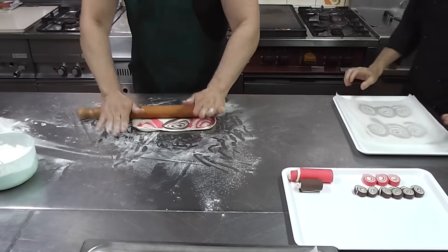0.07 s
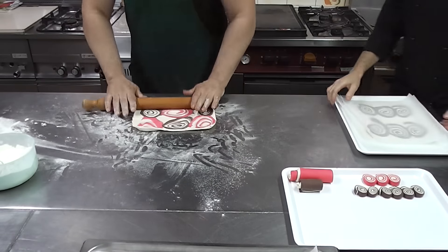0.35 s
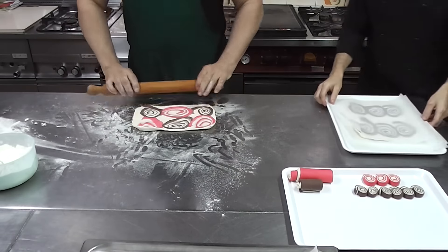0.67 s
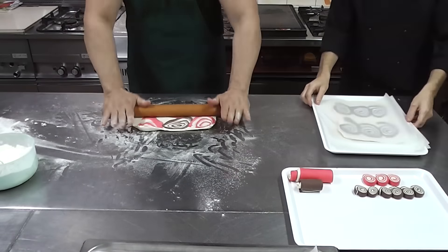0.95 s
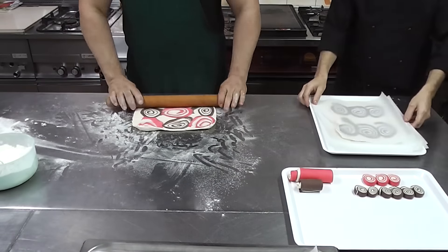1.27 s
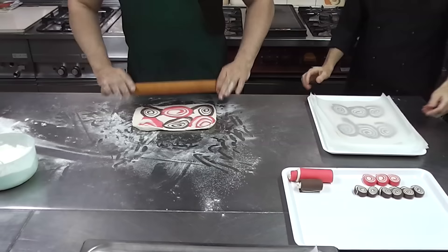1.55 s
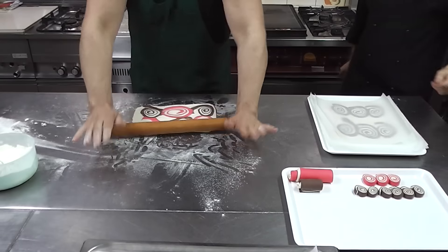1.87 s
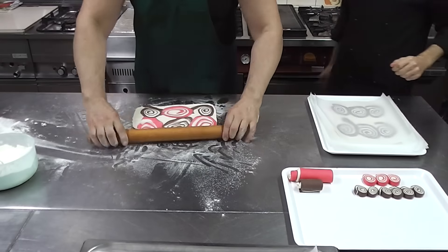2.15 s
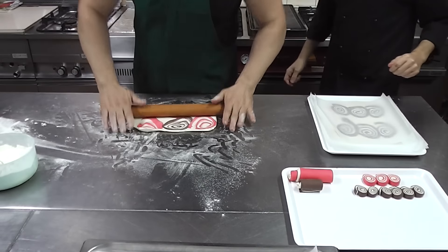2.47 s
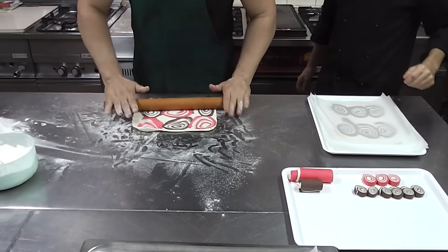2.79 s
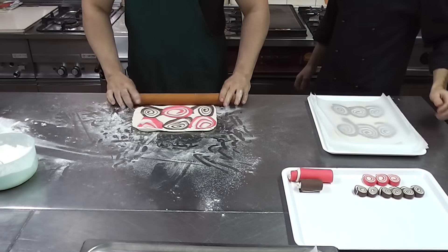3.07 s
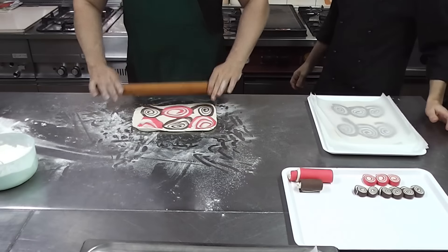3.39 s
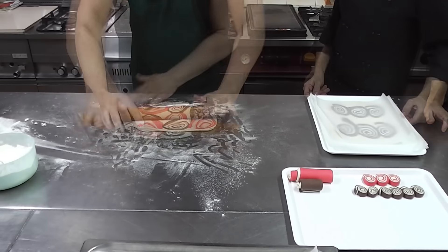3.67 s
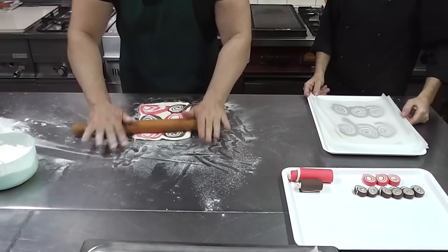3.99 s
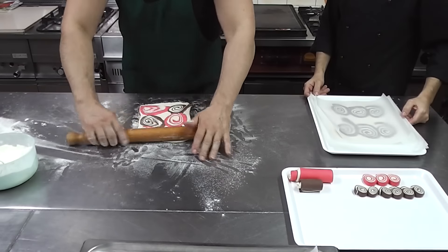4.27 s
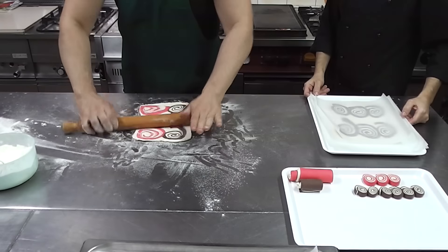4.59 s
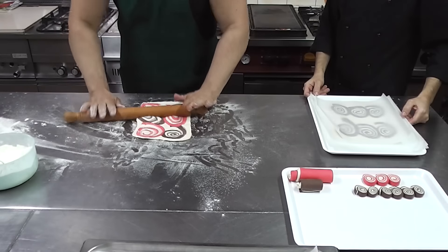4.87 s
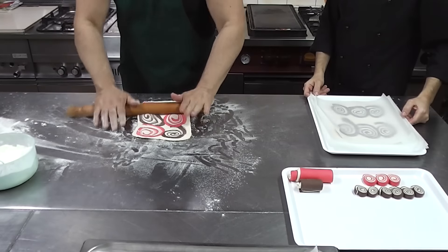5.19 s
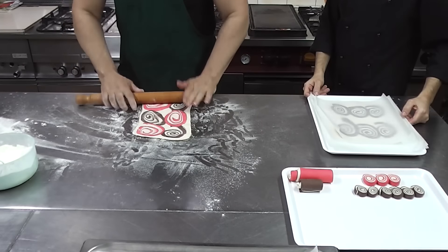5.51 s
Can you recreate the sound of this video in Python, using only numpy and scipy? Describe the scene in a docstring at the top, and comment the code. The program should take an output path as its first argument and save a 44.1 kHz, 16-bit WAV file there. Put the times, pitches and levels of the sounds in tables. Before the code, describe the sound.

A wooden rolling pin thuds, knocks and rumbles over dough on a booming steel worktop, with palms swishing and ventilation humming.

```python
"""A hard-walled kitchen: a wooden rolling pin flattens dough on a stainless-steel worktop.
The pin thuds onto the dough and knocks on the steel, which booms and rings into the room.
Between blows it rumbles over lumps, floury palms swish on the wood, and hands and tray bump lightly.
Ventilation rushes and hums underneath. Brief bright clicks imitate recorder overload on loud blows."""
import sys
import numpy as np
from scipy import signal
from scipy.fft import rfft, irfft
from scipy.io import wavfile
from scipy.ndimage import uniform_filter1d

SR = 44100
rng = np.random.default_rng(int(sys.argv[2]) if len(sys.argv) > 2 else 0)


def dump(signal):
    """Clip the signal to [-1, 1] and save it as 16-bit WAV at the path in sys.argv[1]."""
    limited = np.clip(np.atleast_2d(signal).T, -1, 1)
    pcm = np.round(limited * 32767).astype(np.int16)
    wavfile.write(sys.argv[1], SR, pcm)


N = 253134
TAIL_SAMPLES = 32768


def amp(db):
    """Decibels to gain."""
    return 10 ** (np.asarray(db) / 20)


def unit_rms(x):
    """Scales to an rms of one."""
    return x / np.sqrt(np.mean(x ** 2) + 1e-20)


def lookup(table, hz):
    """Interpolates a table over log frequency."""
    table_hz, value = np.transpose(table)
    return np.interp(np.log(hz + 1), np.log(table_hz + 1), value)


def colour(x, spectrum):
    """Filters by a spectrum table."""
    size = x.shape[-1]
    return irfft(rfft(x) * amp(lookup(spectrum, np.fft.rfftfreq(size, 1 / SR))), size)


def bell(hz, centre_hz, half_width_oct):
    """Spectral peak of unit height."""
    return 1 / (1 + (np.log2((hz + 1) / centre_hz) / half_width_oct) ** 2)


def pulse(gain):
    """Minimum-phase pulse with this magnitude spectrum."""
    log_gain = np.log(np.maximum(np.r_[gain, gain[-2:0:-1]], 1e-5))
    spectrum = np.exp(np.conj(signal.hilbert(log_gain)))
    return np.fft.ifft(spectrum).real[None, :len(gain)]


def convolve(response, force):
    """Drives a response with a force."""
    return signal.fftconvolve(response, force, axes=1)


def ring(modes):
    """One damped sine per mode: unit energy times its level."""
    t = np.arange(TAIL_SAMPLES) / SR
    hz, db, t60_s = np.transpose(modes)[:, :, None]
    waves = np.sin(2 * np.pi * hz * t) * np.exp(-np.log(1000) * t / t60_s)
    return waves / np.linalg.norm(waves, axis=1, keepdims=True) * amp(db)


def wander(depth_db, window_s):
    """Randomly wandering gain."""
    drift = uniform_filter1d(rng.standard_normal(N), max(int(window_s * SR), 1))
    return amp(depth_db * unit_rms(drift))


def add(mix, time_s, sound):
    """Mixes in a stereo sound."""
    start = round(time_s * SR)
    sound = sound[:, max(-start, 0):]
    part = mix[:, max(start, 0):][:, :sound.shape[1]]
    part += sound[:, :part.shape[1]]


# Left-right coherence of the room (frequency [Hz], coherence [0-1])
COHERENCE = [(100, .997), (300, .985), (600, .92), (1000, .76), (2000, .58), (4000, .5), (8000, .48),
             (14000, .55)]
def diffuse(size):
    """Stereo white noise: alike in the bass, less so in the treble."""
    a, b = rfft(rng.standard_normal((2, size)))
    coherence = lookup(COHERENCE, np.fft.rfftfreq(size, 1 / SR))
    mid, side = a * np.sqrt((1 + coherence) / 2), b * np.sqrt((1 - coherence) / 2)
    return irfft(np.array([mid + side, mid - side]), size)


# Air rush spectrum (frequency [Hz], relative level [dB])
AIR_SPECTRUM = [(20, -24), (40, -9), (72, 0), (130, -3), (220, -3), (350, -9.5), (800, -11.5), (1300, -16),
                (1900, -16), (2600, -25.5), (4300, -25), (9500, -28), (12500, -34), (16000, -40)]
# Hum tones (frequency [Hz], level [dB])
HUM_TONES = [(62, -52), (100, -54)]
def ventilation(air_db=-48):
    """Steady rush of air with a wavering hum."""
    t = np.arange(N) / SR
    hum = np.zeros(N)
    for hz, db in HUM_TONES:
        tone = np.sin(2 * np.pi * (hz * t + rng.random()))
        hum += amp(db) * unit_rms(tone * wander(depth_db=3, window_s=.2))
    return amp(air_db) * unit_rms(colour(diffuse(N), AIR_SPECTRUM)) + hum


def hand_speed(start_s, length_s, attack_s=.022, swell_db=4.5, release_s=.055):
    """One stroke, 0-1: the hand takes hold, gathers speed, then slows."""
    t = np.maximum(np.arange(N) / SR - start_s, 0)
    attack = 1 - np.exp(-t / attack_s)
    swell = amp(swell_db * (np.minimum(t / length_s, 1) - 1))
    release = np.exp(-np.maximum(t - length_s, 0) / release_s)
    return attack * swell * release


# Skin-on-wood spectrum (frequency [Hz], relative level [dB])
SKIN_SPECTRUM = [(300, -14), (1200, 1), (1900, 0), (2600, -4), (4200, 0), (7300, 2), (10000, -2),
                 (12000, -13), (15500, -21)]
# Loose flour spectrum (frequency [Hz], relative level [dB])
FLOUR_SPECTRUM = [(2000, -30), (6000, -12), (10000, 0), (13000, -2), (16000, -7)]
# Palm strokes (start [s], length [s], relative skin level [dB], relative flour level [dB])
PALM_STROKES = [(0.21, .06, -60, -59), (0.43, .11, -53, -54), (0.6, .22, -46.5, -68), (0.87, .28, -50, -59),
                (1.3, .05, -59, -55), (1.38, .06, -59, -70), (1.59, .17, -53, -68), (2.04, .14, -52, -53),
                (2.65, .06, -56, -57), (2.78, .1, -58, -68), (2.94, .19, -51.5, -52), (3.3, .28, -54, -72),
                (3.7, .03, -62, -59), (3.82, .04, -57, -54), (4.29, .14, -58, -60), (4.56, .035, -54, -49),
                (4.8, .23, -61, -62), (5.215, .125, -48.5, -50), (5.56, .16, -49.5, -57)]
def palms(skin_gain_db=4.5, fizz_power=1.7):
    """Skin slides over wood in a grainy hiss; loose flour fizzes above it at speed."""
    skin_level, flour_level = np.zeros((2, N))
    for start_s, length_s, skin_db, flour_db in PALM_STROKES:
        speed = hand_speed(start_s, length_s)
        skin_level += amp(skin_db + skin_gain_db) * speed
        flour_level += amp(flour_db) * speed ** fizz_power
    grains = diffuse(N) * wander(depth_db=2, window_s=.001) * wander(depth_db=.8, window_s=.03)
    dust = diffuse(N) * wander(depth_db=2.5, window_s=.002) * wander(depth_db=1.5, window_s=.025)
    hiss = skin_level * unit_rms(colour(grains, SKIN_SPECTRUM))
    fizz = flour_level * unit_rms(colour(dust, FLOUR_SPECTRUM))
    return hiss + fizz


# Steel top modes (frequency [Hz], relative level [dB], t60 [s])
WORKTOP_MODES = [(65, -17, .8), (99, -11, .6), (142, -13, .5), (161, -12, .55), (231, -21, .45),
                 (266, -14, .45), (362, -13, .4), (469, -12, .45), (715, -18, .4), (853, -14, .55),
                 (1003, -18, .4), (1321, -16, .4), (1480, -18, .4)]
def worktop(gain_db):
    """Boom and ring of the steel top, one row per mode."""
    return amp(gain_db) * ring(WORKTOP_MODES)


# Rolling spectrum (frequency [Hz], relative level [dB])
RUMBLE_SPECTRUM = [(25, -22), (60, -3), (110, 0), (220, -3), (450, -6), (800, -8), (1500, -13), (2000, -18),
                   (3000, -29), (8000, -52)]
# Passes over the dough (start [s], length [s], full-speed level [dB])
PIN_PASSES = [(0.2, 1.4, -44), (1.68, .62, -40), (2.46, .5, -35.5), (3.95, .6, -41.5), (4.65, .52, -42)]
def rolling(speed_power=1.2):
    """The pin jolts over lumps and flour and shakes the top; each pass is one arch of speed."""
    t = np.arange(N) / SR
    level = np.zeros(N)
    for start_s, length_s, db in PIN_PASSES:
        speed = abs(np.sin(np.pi * np.clip((t - start_s) / length_s, 0, 1)))
        level += amp(db) * speed ** speed_power
    jolts = diffuse(N) * wander(depth_db=3, window_s=.015)
    steel = convolve(worktop(gain_db=-19).sum(0)[None], jolts)[:, :N]
    return level * unit_rms(colour(jolts + steel, RUMBLE_SPECTRUM))


# Decay of the sheet's dense modes (frequency [Hz], t60 [s])
SHEET_T60 = [(80, .45), (300, .29), (1000, .27), (2000, .31), (4000, .29), (16000, .15)]
# Decay of the kitchen's echoes (frequency [Hz], t60 [s])
ROOM_T60 = [(80, .9), (210, .65), (560, .56), (1470, .56), (3900, .5), (9000, .4), (16000, .25)]
# Spectrum of both together (frequency [Hz], relative level [dB])
TAIL_SPECTRUM = [(30, -14), (70, -7), (150, -3), (300, -2), (600, -1), (2000, -1), (6000, -1.5),
                 (10000, -4), (16000, -9)]
def sheet_and_room(room_share=.45, rise_s=.002):
    """Diffuse tail: the steel sheet's dense modes die quickly; kitchen echoes outlast them."""
    hz, t, noise = signal.stft(diffuse(TAIL_SAMPLES), SR, nperseg=256)
    power = 0
    for t60_table, share in (SHEET_T60, 1 - room_share), (ROOM_T60, room_share):
        rate_per_s = np.log(1e6) / lookup(t60_table, hz)[:, None]
        power += share * rate_per_s * np.exp(-rate_per_s * t)
    fade = np.sqrt(power / SR) * amp(lookup(TAIL_SPECTRUM, hz))[:, None]
    tail = signal.istft(noise * fade, SR, nperseg=256)[1][:, :TAIL_SAMPLES]
    return tail * (1 - np.exp(-np.arange(TAIL_SAMPLES) / SR / rise_s))


# Hand and tray contacts (time [s], relative level [dB], centre [Hz], half-width [oct])
LIGHT_TAPS = [(0.488, 9, 4000, .06), (0.4885, 2, 5800, .05), (0.489, 1, 3500, .8), (0.489, 17, 1330, .13),
              (0.62, 9, 800, .7), (1.915, -7, 6000, .6), (2.11, 25, 100, .35), (2.445, 16, 200, .6),
              (3.233, 15, 220, .4), (3.287, 13, 1600, .42), (3.283, -6, 5500, .6), (3.42, -4, 4000, .6),
              (3.908, 41, 100, .42), (5.29, 3, 800, .5), (5.32, 9, 700, .6), (5.33, 15, 130, .5),
              (5.527, -5.5, 4500, .7)]
def taps(tails, direct_gain=.25):
    """Light taps and soft bumps, heard mostly through sheet and room."""
    out, hz = np.zeros((2, N)), np.fft.rfftfreq(2048, 1 / SR)
    for k, (time_s, db, centre_hz, half_width_oct) in enumerate(LIGHT_TAPS):
        response = tails[k % len(tails)].copy()
        response[:, 0] += direct_gain
        force = pulse(amp(db) * bell(hz, centre_hz, half_width_oct))
        add(out, time_s, convolve(response, force))
    return out


# Overload click spectrum (frequency [Hz], relative level [dB])
OVERLOAD_SPECTRUM = [(500, 0), (2500, 5), (5000, 4), (10000, 1), (13000, -5), (16000, -11)]
def overload_click(hz, decay_s=.0007):
    """Brief bright noise burst imitating recorder overload."""
    fade = np.exp(-np.arange(len(hz)) / SR / decay_s)
    burst = diffuse(len(hz)) * fade / np.linalg.norm(fade)
    return convolve(burst, pulse(amp(lookup(OVERLOAD_SPECTRUM, hz))))


# Wooden pin modes (frequency [Hz], relative level [dB], t60 [s])
PIN_MODES = [(1770, 0, .085), (1836, -10, .25), (1982, -14, .25), (2250, -14, .025), (2900, -20, .015),
             (3750, -19, .015), (4759, -23, .05)]
def pin_ring(knock_db, thud_db, hardness_hz, gain_db=-18, db_per_oct=20, reference_hz=2400):
    """The pin rings louder after a harder knock; dough mutes it when the thud dominates."""
    hardness_db = db_per_oct * np.log2(hardness_hz / reference_hz)
    muting_db = 1.1 * max(thud_db - knock_db, 0)
    return amp(knock_db + gain_db + hardness_db - muting_db) * ring(PIN_MODES).sum(0)[None]


# Force through the dough (frequency [Hz], relative level [dB])
THUD_SPECTRUM = [(20, -15), (45, -7), (90, -.5), (160, 1), (290, 1.5), (450, -2), (650, -12), (1000, -28),
                 (2500, -55)]
# Force of wood on steel (frequency [Hz], relative level [dB])
KNOCK_SPECTRUM = [(40, -32), (150, -14), (280, -2.5), (440, 0), (660, -2), (940, -4), (1300, -3.5),
                  (2000, -9), (4000, -9), (16000, -14)]
# Slap of skin and dough (frequency [Hz], relative level [dB])
SLAP_SPECTRUM = [(200, -10), (1500, 4), (2200, 4), (3000, 2), (4000, 3), (6000, -1), (9000, -3),
                 (12000, -11), (16000, -18)]
# Pin blows, levels relative (time [s], thud [dB], knock [dB], hardness cutoff [Hz],
#   struck-spot pitch [Hz], slap [dB], overload click [dB], direct push [gain])
PIN_BLOWS = [(-0.03, 26, 30, 2050, 1150, -2, -20, .5), (0.127, 24, 33.5, 1420, 520, -13, -21, .5),
             (0.877, 36.5, 19.5, 2250, 100, -5, -16, .45), (1.6838, 32.5, 24.5, 2000, 340, .5, 3, .7),
             (1.9923, 25.5, 34, 1130, 700, -9, -16, .5), (2.0012, 19, 26, 1100, 350, -20, -20, .9),
             (2.0235, 20, 26, 900, 290, -20, -28, .9), (2.4932, 35, 27, 1400, 410, -1.5, -12, .55),
             (2.9315, 25, 28, 1250, 470, -7.5, -21, .38), (2.951, 15, 23, 1300, 1150, -15, -26, .7),
             (3.5015, 33.5, 23, 1850, 100, -1.5, -5, .5), (3.511, 22, 22, 1800, 1200, -4, -10, .6),
             (3.930, 26, 31, 2250, 900, 0.5, -1, .4), (4.2886, 25.5, 32.5, 900, 800, -14, -15, .4),
             (4.3941, 27, 33.5, 1220, 370, -15, -14, .5), (4.6546, 27.5, 31, 1600, 850, -2, -2, .7),
             (5.076, 14.5, 8, 1100, 190, -24, -34, .35), (5.5655, 20.5, 23.5, 1050, 650, -6, -20, .25),
             (5.582, 18, 19, 1000, 600, -6, -17, .3)]
def blows(tails, rolloff_order=4.3, spot_db=5.5, slap_lead_s=.003):
    """Each blow pushes the steel top once and leaves it ringing; harder contact reaches higher."""
    out, hz = np.zeros((2, N)), np.fft.rfftfreq(4096, 1 / SR)
    steel_modes = worktop(gain_db=-15.5)
    slap = pulse(amp(lookup(SLAP_SPECTRUM, hz)))
    for k, blow in enumerate(PIN_BLOWS):
        time_s, thud_db, knock_db, hardness_hz, spot_hz, slap_db, overload_db, direct_gain = blow
        thud = amp(thud_db + lookup(THUD_SPECTRUM, hz))
        knock = amp(knock_db + lookup(KNOCK_SPECTRUM, hz))
        knock /= np.hypot(1, (hz / hardness_hz) ** rolloff_order)
        spot = amp(spot_db * bell(hz, spot_hz, half_width_oct=.2))
        force = pulse(np.hypot(thud, knock) * spot)
        tail = tails[k % len(tails)]
        mode_signs = rng.choice([-1, 1], len(steel_modes))  # vary with the place struck
        response = tail + mode_signs @ steel_modes
        response[:, 0] += direct_gain
        add(out, time_s, convolve(response, force))
        add(out, time_s, convolve(response, pin_ring(knock_db, thud_db, hardness_hz)))
        # surfaces touch before the weight lands
        add(out, time_s - slap_lead_s, amp(slap_db) * convolve(tail, slap))
        add(out, time_s, amp(overload_db) * overload_click(hz))
    return out


# Stereo balance (frequency [Hz], left minus right [dB])
BALANCE = [(100, 4.4), (500, 4.6), (1000, 3.5), (2000, 3.6), (4000, -.8), (8000, 2.2), (13000, .6)]
def scene(places=6):
    """All sources, leaning left; several places on the top each have their own tail."""
    tails = [sheet_and_room() for _ in range(places)]
    left, right = blows(tails) + taps(tails) + rolling() + palms() + ventilation()
    left = colour(left, [(hz, db / 2) for hz, db in BALANCE])
    right = colour(right, [(hz, -db / 2) for hz, db in BALANCE])
    return np.array([left, right])


def record(dry, cutoff_hz=15900):
    """Soft clip of the loudest peaks, then low-pass."""
    rounded = dry / (1 + dry ** 6) ** (1 / 6)
    lowpass = signal.firwin(255, cutoff_hz, window=("kaiser", 8), fs=SR)
    return signal.oaconvolve(rounded, lowpass[None], "same")


dry = scene()
out = record(dry)
dump(out)
```